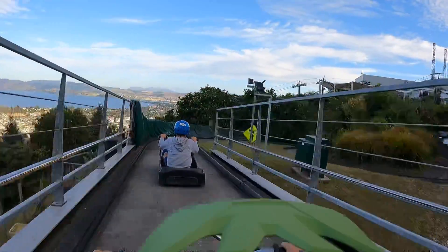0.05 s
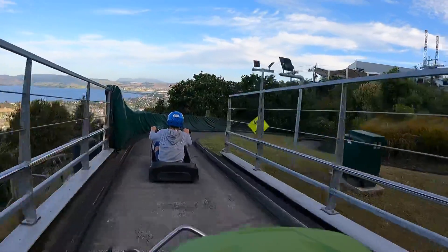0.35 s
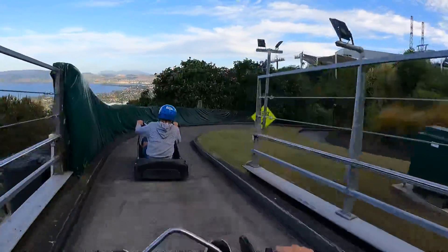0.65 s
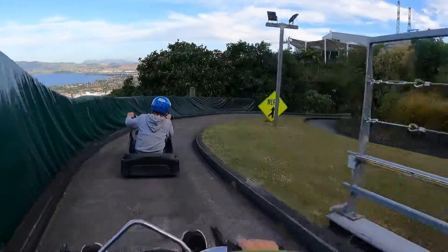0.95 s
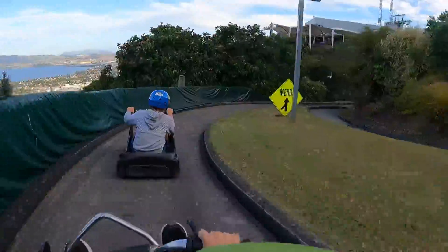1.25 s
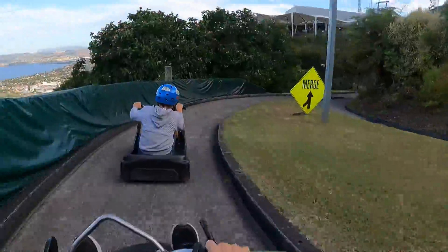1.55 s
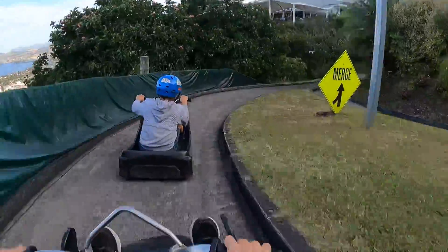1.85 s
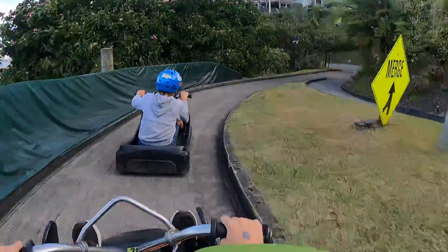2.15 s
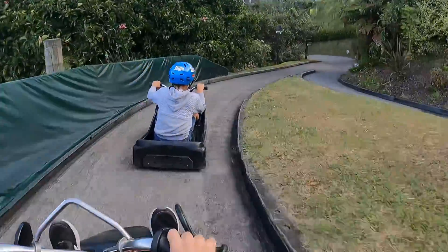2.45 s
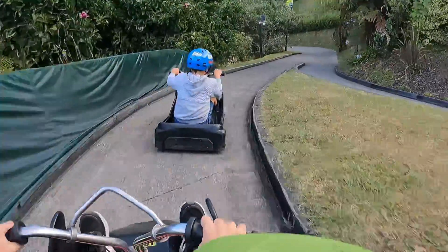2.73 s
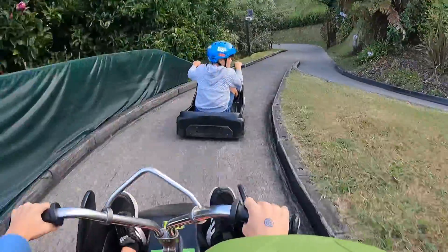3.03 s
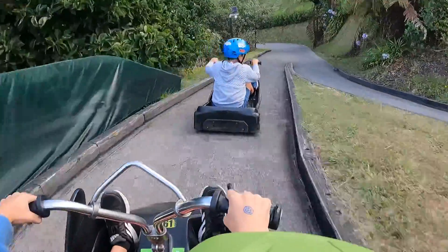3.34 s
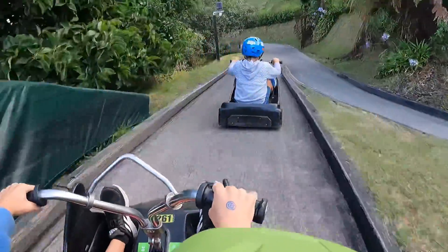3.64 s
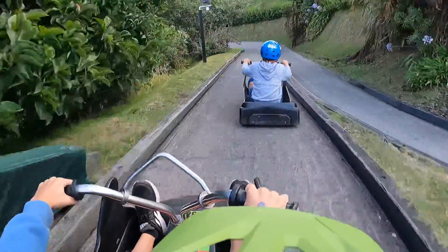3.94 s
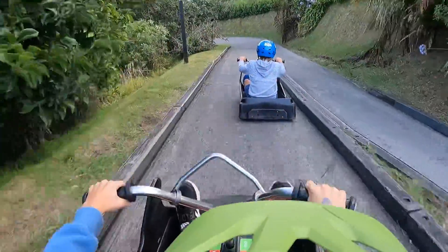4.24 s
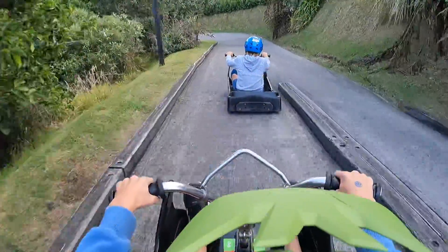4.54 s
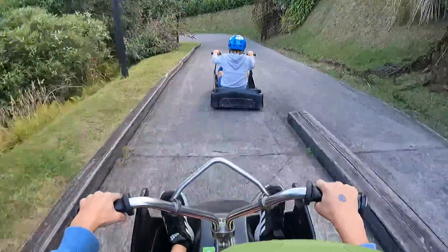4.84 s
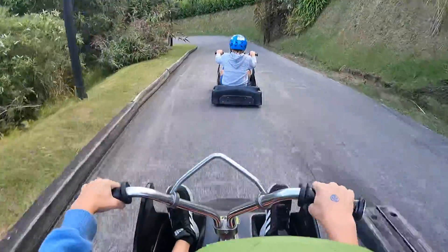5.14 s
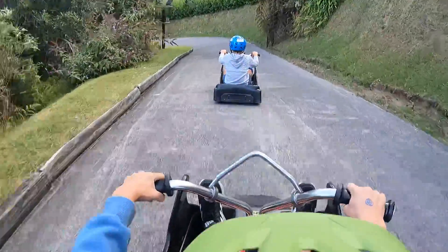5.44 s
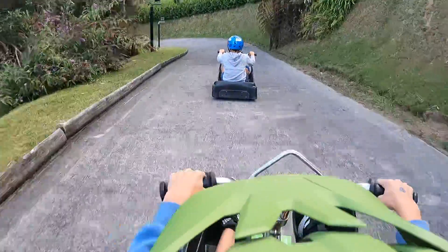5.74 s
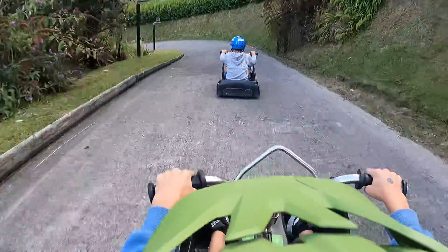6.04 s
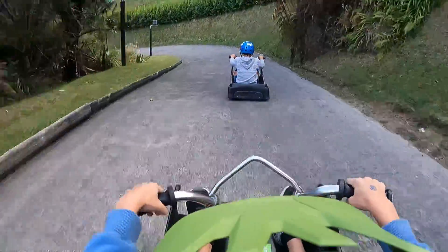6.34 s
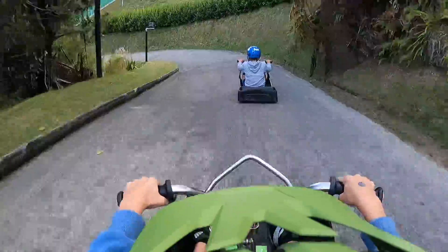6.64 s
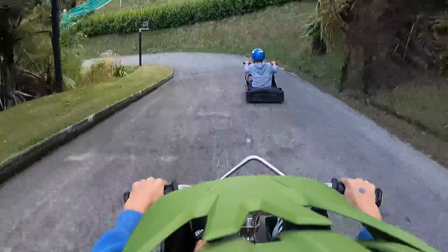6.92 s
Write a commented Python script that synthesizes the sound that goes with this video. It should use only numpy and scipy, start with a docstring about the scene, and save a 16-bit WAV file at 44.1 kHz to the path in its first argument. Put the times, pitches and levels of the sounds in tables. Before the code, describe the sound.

Hard wheels rumble on rough concrete as a coasting luge cart knocks and rattles, with low wind buffeting.

```python
"""A hollow plastic boom with clattering knocks: a luge cart coasting down concrete, heard from the seat.
Hard wheels on the rough surface drive the tub's modes; joints and ridges knock the chassis and
leave parts ringing. Loose fittings chatter, grit crunches, a flat-spotted wheel scuffs once a turn.
Thin whistles and a faint tinkle flicker in the treble. Wind buffets the microphone."""
import sys
import numpy as np
from scipy import signal
from scipy.fft import rfft, irfft, next_fast_len
from scipy.io import wavfile
from scipy.ndimage import uniform_filter1d, map_coordinates

SR = 44100
rng = np.random.default_rng(int(sys.argv[2]) if len(sys.argv) > 2 else 0)


def generate_wav(sig):
    """Save sig (samples, or channels by samples) to the path in sys.argv[1] as 16-bit PCM at SR."""
    pcm = np.round(np.clip(np.atleast_2d(sig).T, -1, 1) * 32767).astype(np.int16)
    wavfile.write(sys.argv[1], SR, pcm)


N = 307818

# plastic tub modes: f/Hz, width/Hz, gain/dB
TUB_MODES = [(159.8, 30, -3), (186.4, 52, -7.5), (247.6, 20.8, 0), (299.4, 47.6, -4.5), (375, 85, -8),
             (409.2, 28, -1.5), (427.3, 27, -9.5), (542.6, 29, -11), (582, 24, -10.5)]
# chassis and fitting modes: f/Hz, width/Hz, gain/dB
CHASSIS_MODES = [(751, 115, 18.5), (884, 82, 5), (1012, 140, 2.5), (1420, 67, -4), (2070, 33, -16),
                 (2440, 160, -30), (2570, 420, -27.5), (3260, 390, -35), (4670, 1900, -24.5)]
# steering click spectrum: f/Hz, gain/dB
CLICK_SPECTRUM = [(600, -57), (3000, -4), (4300, 7), (5000, -3), (6800, -7.5), (8500, -11), (10000, -27.5),
                  (12500, -20), (14500, -44.5)]


def tub(shake):
    """Rough concrete drives the tub's modes; rumble fills in between, the wheels add their drone."""
    # wheel drive on the tub: t/s, level/dB
    boom_levels = [(0, -15.5), (.3, -16), (.55, -15), (1.45, -14.5), (1.7, -17), (2.0, -15), (2.4, -16),
                   (2.7, -15), (2.95, -13.5), (3.15, -15.5), (4.5, -16), (4.9, -15.5), (5.1, -13.5),
                   (5.35, -13), (5.6, -17), (6.3, -14), (6.75, -15.5), (6.98, -19.5)]
    # upper modes: t/s, level/dB
    upper_levels = [(0, -24.5), (.9, -27), (1.35, -26.5), (1.6, -28), (2.1, -28), (2.6, -24.5), (3.0, -27),
                    (3.65, -23.5), (4.6, -25.5), (5.3, -24.5), (6.98, -27.5)]
    # upper modes groan as the tub leans into the bend: t/s, width/s, rise/dB
    groans = [(1.325, 0.026, 7), (1.44, 0.036, 3)]
    # rumble spectrum: f/Hz, gain/dB
    rumble_spectrum = [(60, -54.5), (115, -23), (150, -13), (200, 4), (300, -7.5), (480, -8.5), (630, -27),
                       (690, -23.5), (1000, -22.5), (1500, -35.5), (3000, -74.5)]
    boom_db = curves(boom_levels)[0] + wobble(18)  # wheel load shifts at random
    upper_db = curves(upper_levels)[0] + swells(groans) + 1.2 * wobble(18)
    roughness = impacts(per_s=2500, spread_db=4.5)
    modes = unit(band(ringing(roughness, TUB_MODES), 132.8, 646, order=9))
    body = modes + amp(-8) * unit(coloured(rng.standard_normal(N), rumble_spectrum))
    low = filtered(body, lambda hz: 1 / (1 + (hz / 350) ** 12))
    boom = steadied(unit(low) + amp(-3) * wheels(), span_s=0.062, share=0.92)
    upper = steadied(body - low, span_s=0.098, share=0.82) * amp(shake)
    return band(amp(boom_db) * boom + amp(upper_db) * upper, 30, 2500, order=2)  # soft plastic: no treble


def wheels():
    """Wheels bounce on the concrete: a firm hum inside an uneven drone that sinks along the track."""
    # bounce resonance: t/s, f/Hz
    bounce_pitch = [(0, 205), (.55, 206.6), (1.0, 220.3), (1.4, 226.6), (1.9, 204.3), (2.3, 190.3),
                    (2.9, 173.6), (3.6, 184.4), (4.1, 182), (4.6, 170.6), (5.3, 177.1), (6.2, 169),
                    (6.98, 170.7)]
    # hum over drone: t/s, level/dB
    hum_levels = [(0, -8), (2.2, -6), (2.85, -0.5), (3.6, -7.5), (4.6, -5.5), (5.25, 2), (5.6, -2.5),
                  (6.98, -3)]
    bounce_hz, = curves(bounce_pitch)
    hum_db, = curves(hum_levels)
    phase = 2 * np.pi * np.cumsum(bounce_hz) / SR
    drone = unit(wobble(38) * np.cos(phase) + wobble(38) * np.sin(phase))
    hum = unit(np.cos(phase + 1.1 * wobble(14)))
    return unit(drone + amp(hum_db) * hum)


def jolts():
    """Joints and ridges in the concrete hit the wheels."""
    # blows, levels before jolt()'s offsets: t/s, rattle/dB, knock/dB, clink/dB, knock f/Hz, rattle f/Hz
    blows = [(0.0507, -38, -19.5, -60, 850, 2040), (0.060, -38, -21, -57, 885, 1990),
             (0.1047, -25, -16, -54, 726, 2000), (0.1381, -35, -21, -58, 724, 2630),
             (0.1524, -30, -18, -57, 726, 2010), (0.178, -30, -25, -57, 780, 1900),
             (0.2149, -33, -24.5, -53, 1020, 1950), (0.2754, -38, -18, -55, 830, 2080),
             (0.289, -40, -20.5, -56, 900, 1900), (0.323, -41, -21, -62, 750, 1900),
             (0.3554, -43, -23, -65, 705, 1780), (0.393, -36, -19.5, -60, 805, 1950),
             (0.4614, -38, -18, -51, 784, 2000), (0.505, -38, -21.5, -53, 960, 2000),
             (0.5634, -28.5, -21, -46.5, 735, 2160), (0.6714, -30, -16.5, -42, 717, 2500),
             (0.6923, -28.5, -18, -44.5, 740, 2660), (0.7554, -29, -28, -45, 930, 2630),
             (0.7969, -24.5, -14, -40, 740, 1970), (0.8204, -31, -25, -45.5, 726, 2760),
             (0.8692, -25.5, -20, -42, 680, 2240), (0.9305, -39, -22, -41.5, 694, 2300),
             (0.9401, -24.5, -15, -41.5, 695, 1950), (0.969, -32, -19, -53, 740, 2100),
             (0.9865, -35, -18.5, -40, 704, 2400), (0.9966, -25, -16, -40, 760, 2070),
             (1.0284, -30, -23, -44, 766, 2280), (1.1122, -24, -28, -42, 1090, 2050),
             (1.136, -38, -21, -58, 800, 1900), (1.1852, -21.5, -15.5, -41, 700, 1930),
             (1.2014, -27, -18, -58, 856, 2070), (1.2152, -27, -19, -59, 776, 2060),
             (1.2371, -25.5, -19, -51, 720, 1920), (1.271, -35, -20, -57, 745, 2000),
             (1.3215, -34, -17, -43.5, 690, 2010), (1.3354, -33, -17, -44, 710, 2100),
             (1.3823, -42, -25, -53, 741, 2260), (1.404, -42, -21, -54, 740, 1900),
             (1.4260, -33, -25, -50, 690, 1808), (1.453, -32, -19, -52, 720, 1920),
             (1.5451, -36, -18.5, -51, 770, 1960), (1.6532, -49, -20.5, -60, 844, 2230),
             (1.7549, -39, -19, -64, 890, 1800), (1.8262, -35, -24.5, -66, 810, 2140),
             (1.992, -36, -27, -59, 800, 1900), (2.119, -34, -26, -54, 979, 1960),
             (2.2327, -36, -36, -58, 730, 1740), (2.313, -34, -29, -66, 850, 1947),
             (2.425, -44, -24, -65, 776, 1800), (2.547, -40, -25, -63, 810, 1750),
             (2.601, -41, -22, -56, 753, 1975), (2.7385, -36, -23, -56, 740, 2430),
             (2.839, -37.5, -24.5, -56, 902, 1996), (2.883, -43, -40, -51.5, 737, 2130),
             (2.996, -41.5, -25, -62, 799, 1890), (3.2457, -29, -29, -64, 1239, 2080),
             (3.442, -40, -23, -51, 740, 2168), (3.5753, -39, -20, -67, 755, 2112),
             (3.62, -35, -23, -57, 803, 2006), (3.662, -32, -19.5, -59, 775, 2030),
             (3.6934, -30, -23.5, -58, 818, 2030), (3.922, -45, -25, -67, 676, 2289),
             (3.9959, -44, -24, -64, 679, 1741), (4.0984, -41, -33, -49, 870, 2190),
             (4.2054, -31.5, -24, -51, 763, 1980), (4.295, -38, -29, -54, 814, 2100),
             (4.4762, -32, -26, -45, 788, 2110), (4.533, -35, -23, -44, 734, 2023),
             (4.64, -27, -30, -54, 890, 1910), (4.6566, -33.5, -36, -46, 1124, 2780),
             (4.7321, -26, -21, -46, 765, 2010), (4.776, -27, -26, -45, 790, 2092),
             (4.79, -26.5, -24, -44, 919, 2030), (4.831, -21, -15.5, -45, 745, 2260),
             (4.8942, -28, -18.5, -42, 750, 2320), (4.9218, -25, -25, -44, 860, 1940),
             (5.012, -32, -22, -48, 745, 2058), (5.036, -27, -20, -53, 756, 1900),
             (5.0568, -30, -32.5, -46, 901, 2100), (5.1872, -25, -22, -51, 770, 1960),
             (5.222, -45, -23.5, -58, 760, 1900), (5.2856, -32, -27, -52.5, 782, 2205),
             (5.3466, -38.5, -29, -59, 810, 1770), (5.446, -30.5, -22, -50.5, 1030, 2150),
             (5.508, -36, -26, -58, 850, 1904), (5.6104, -53, -25.5, -63, 773, 1704),
             (5.7786, -37, -28, -59, 902, 1950), (5.8077, -41, -20.5, -64, 794, 1960),
             (5.926, -40, -29, -47.5, 747, 2060), (6.0442, -36, -39, -50, 740, 1750),
             (6.1559, -37, -28, -49, 838, 2163), (6.2145, -34.5, -28, -50, 895, 2110),
             (6.295, -33, -26.5, -51, 800, 2100), (6.3534, -36, -29, -47, 821, 2570),
             (6.516, -38, -22, -61, 780, 2000), (6.578, -38, -25, -52, 1031, 1973),
             (6.632, -32, -27, -54.5, 816, 2000), (6.7694, -40, -27, -51, 680, 2047)]
    # the cart drags over the first bend's ridges, taps later joints: t/s, contact length/ratio
    drag_ratios = [(0, 0.77), (.55, 1.7), (.67, 3.4), (1.03, 1.3), (1.11, 0.4), (1.25, 1.7), (1.35, 4.7),
                   (1.55, 1.3), (4.6, 1.3), (5.3, 1.04), (6.98, 1.106)]
    out = np.zeros(N + SR)
    for start_s, *strike in blows:
        drag = np.interp(start_s, *np.transpose(drag_ratios))
        blow = jolt(drag, *strike)
        out[round(start_s * SR):][:len(blow)] += blow
    return out[:N]


def jolt(drag, rattle_db, knock_db, clink_db, knock_hz, rattle_hz):
    """One blow cracks, knocks and rattles the chassis and clinks the steering."""
    # steering bar and brake linkage modes: f/Hz, width/Hz, gain/dB
    steel_modes = [(3640, 110, 8.5), (4340, 100, 2), (5300, 130, -2.5), (5900, 160, -7), (6860, 84, -5.5),
                   (7730, 150, -6.5), (8600, 81, -6.5)]
    # each blow lands elsewhere: new mode pitches and gains
    struck = [(hz * (1 + 0.054 * rng.standard_normal()), 0.45 * width_hz, db + 2 * rng.standard_normal())
              for hz, width_hz, db in CHASSIS_MODES]
    steel = [(hz * (1 + 0.05 * rng.standard_normal()), width_hz, db + 4 * rng.standard_normal())
             for hz, width_hz, db in steel_modes]
    knock = unit(band(ringing(burst(t60_s=0.048 * drag), struck), 470, 1900, order=3))
    knock += amp(-1) * unit(ringing(burst(t60_s=0.018), TUB_MODES[-2:]))
    knock += amp(-2) * unit(ringing(burst(t60_s=0.019), [(knock_hz, 40, 0)]))
    rattle = unit(band(ringing(burst(t60_s=0.053 * drag), struck), 1400, 4600, order=4))
    rattle += amp(-6.5) * unit(ringing(burst(t60_s=0.038), [(rattle_hz, 90, 0)]))
    contact = burst(t60_s=0.045 * drag)
    clink = unit(coloured(contact, CLICK_SPECTRUM))
    clink += amp(-4) * unit(band(ringing(contact, steel), 3300, 9000, order=4))
    chassis = at_level(knock, knock_db - 8) + at_level(rattle, rattle_db - 11)
    crack = at_level(band(burst(t60_s=0.0072), 1100, 4100, order=3), rattle_db - 21)
    return band(chassis, 280, 3400, order=4) + crack + at_level(clink, clink_db - 3)


def rings():
    """Hard blows leave a panel or fitting ringing briefly, with a dry buzz."""
    # ringing parts: t/s, f/Hz, level/dB, t60/s
    parts = [(0.107, 563, -13.5, 0.08), (0.138, 2640, -34, 0.036), (0.153, 533, -15, 0.085),
             (0.669, 713, -15.5, 0.11), (0.688, 2560, -35, 0.078), (0.748, 2720, -34.5, 0.11),
             (0.797, 1960, -27, 0.037), (0.87, 728, -20, 0.095), (1.187, 1934, -27, .05),
             (1.189, 544, -15.5, 0.11), (1.232, 553, -14, 0.16), (1.443, 402, -7, 0.13),
             (1.449, 525, -15, 0.087), (1.547, 804, -25, 0.053), (1.826, 1040, -27, 0.053),
             (3.245, 1001, -20, 0.058), (3.246, 1982, -31, 0.052), (3.247, 3090, -38, .06),
             (3.246, 4150, -42.5, 0.055), (3.428, 4320, -41, 0.041), (3.577, 1087, -24.5, 0.066),
             (3.662, 3850, -42.5, .05), (3.692, 4400, -43, 0.096), (4.657, 4500, -35, 0.044),
             (4.79, 4410, -42, .06), (4.832, 2420, -32, 0.085), (4.832, 784, -17.5, 0.076),
             (4.831, 1400, -33, 0.048), (4.895, 2330, -32, 0.074), (4.921, 558.6, -10.5, 0.076),
             (4.921, 6500, -38.5, 0.03), (4.922, 3330, -31.5, 0.041), (5.057, 4430, -41, .06),
             (5.188, 3300, -34, 0.029), (5.188, 1760, -31, 0.038), (5.19, 787, -24, 0.13),
             (5.779, 1104, -25, 0.051)]
    rise_s, relative_width = 0.0018, 0.035
    out, t = np.zeros(N + SR), np.arange(SR // 5) / SR
    for start_s, hz, db, t60_s in parts:
        buzz_rad = np.cumsum(rng.standard_normal(len(t))) * np.sqrt(2 * np.pi * relative_width * hz / SR)
        envelope = amp(db - 60 * t / t60_s) * (1 - np.exp(-t / rise_s))
        ring = envelope * np.sin(2 * np.pi * hz * t + buzz_rad)
        out[round(start_s * SR):][:len(t)] += band(ring, hz / 2, hz * 2, order=2)
    return out[:N]


def chatter(surface_db, shake):
    """Loose fittings never rest, and tap harder as the cart shakes."""
    taps = unit(impacts(per_s=130, spread_db=2)) + amp(3.5) * rng.standard_normal(N)
    taps *= amp(2.5 * np.clip(shake, -1, 2))
    rattle = band(ringing(taps, CHASSIS_MODES), 712, 2560, order=4)
    return amp(surface_db + 0.27) * steadied(rattle, span_s=0.99, share=0.51)


def wind():
    """Air tumbles over the microphone in low lumps."""
    # airflow: t/s, level/dB
    flow_levels = [(0, -20.5), (.5, -31), (.9, -29.5), (1.35, -26.5), (2.0, -31), (2.85, -34), (3.2, -30.5),
                   (3.9, -34), (4.4, -29), (5.3, -30.5), (6.0, -33.5), (6.5, -27.5), (6.98, -31)]
    # gusts: t/s, width/s, rise/dB
    gusts = [(.7, 0.05, 2.5), (1.68, 0.03, 10.5), (3.06, 0.09, 5.5), (5.79, 0.056, 8), (6.16, 0.039, 6),
             (6.5, 0.039, 1)]
    # buffet spectrum: f/Hz, gain/dB
    buffet_spectrum = [(10, -2.5), (22, 2.5), (38, 8), (55, 8.5), (85, 7), (115, 4), (170, -3),
                       (400, -57.5), (1500, -120)]
    turbulence_db = 3 * wobble(12)
    buffet_db = curves(flow_levels)[0] + swells(gusts) + turbulence_db + 2.5
    buffet = coloured(rng.standard_normal(N), buffet_spectrum)
    return amp(buffet_db) * steadied(buffet, span_s=0.34, share=0.36)


def grit(surface_db, shake):
    """Sand grains crunch under the wheels over a fine rolling hiss."""
    # crunch spectrum: f/Hz, gain/dB
    crunch_spectrum = [(300, -56), (900, -7.5), (1550, 6), (2200, -3), (2900, 1), (3600, 0.5), (4450, -2.5),
                       (4800, -4), (6500, -10.5), (7900, -13), (9300, -21), (12000, -29), (15000, -50.5)]
    grains = unit(impacts(per_s=260, spread_db=3.5)) + amp(9.5) * rng.standard_normal(N)
    load = np.clip(unit(0.73 * shake + wobble(45)), -1, 2)
    crunch = coloured(grains * amp(1.9 * load), crunch_spectrum)
    return amp(surface_db + 2.5) * steadied(crunch, span_s=0.67, share=0.58)


def flat_spot(turns, chatter_db, grit_db):
    """Once a turn a wheel's flat nudges chassis and steering, harder on rough track up to a cap."""
    rise_s, t60_s, spread_db = 0.003, 0.04, 2.5
    onsets = np.flatnonzero(np.diff(np.floor(turns)))
    drops = np.zeros(N)
    drops[onsets] = amp(spread_db * np.clip(rng.standard_normal(N)[onsets], -2, 2))
    t = np.arange(SR // 10) / SR
    press = (1 - np.exp(-t / rise_s)) * amp(-60 * t / t60_s)
    contact = signal.fftconvolve(drops, press)[:N] * rng.standard_normal(N)
    rattle = unit(band(ringing(contact, CHASSIS_MODES), 850, 3100, order=4))
    clink = unit(coloured(contact, CLICK_SPECTRUM))
    rattle_db = np.minimum(chatter_db, -41) - 12.5
    clink_db = np.minimum(grit_db, -57) - 13
    return amp(rattle_db) * rattle + amp(clink_db) * clink


def whistles():
    """Thin, faint, flickering high whistles of narrow-band noise."""
    # whistles: t/s, length/s, f/Hz, level/dB
    events = [(0.06, 0.067, 8550, -65), (0.073, 0.17, 10000, -76), (1.112, 0.093, 8670, -66),
              (1.23, 0.13, 8500, -66), (4.033, 0.27, 7400, -68), (4.633, 0.093, 5400, -65),
              (4.637, .06, 9100, -65), (5.101, 1.7, 7650, -77), (6.011, .07, 9000, -76),
              (6.415, 0.28, 8486, -76), (6.82, 0.051, 8570, -71)]
    width_hz = 210
    out, t = np.zeros(N), np.arange(N) / SR
    for start_s, length_s, hz, db in events:
        swell = np.sin(np.pi * np.clip((t - start_s) / length_s, 0, 1))
        whistle = band(rng.standard_normal(N), hz - width_hz / 2, hz + width_hz / 2, order=2)
        out += amp(db) * swell * unit(whistle)
    flicker = unit(amp(2.5 * np.clip(wobble(12), -2, 1)))
    return out * flicker


def tinkle():
    """Faint, flickering high tinkle: narrow bands, each rung by its own random ticks."""
    # tinkle bands: f/Hz, width/Hz, gain/dB
    bands = [(4450, 90, 3.5), (7740, 70, 0), (8050, 90, -3.5), (8550, 70, -5), (9100, 80, -9.5),
             (12500, 300, -16)]
    # all bands together: t/s, level/dB
    tinkle_levels = [(0, -77.5), (1.3, -64), (1.9, -83), (2.8, -78), (3.9, -77.5), (4.7, -73), (5.25, -73),
                     (5.6, -76), (6.2, -70), (6.98, -72)]
    out = np.zeros(N)
    for hz, width_hz, db in bands:
        ticks = impacts(per_s=44, spread_db=5)
        out += amp(db) * unit(band(ticks, hz - width_hz / 2, hz + width_hz / 2, order=1))
    return amp(curves(tinkle_levels)[0]) * unit(out)


def burst(t60_s):
    """A contact and its quick rebound: a dying scatter of tiny collisions."""
    rise_s = 0.0008
    t = np.arange(SR // 12) / SR
    since_rebound_s = t - rng.uniform(0.002, 0.005)
    rebound = (since_rebound_s > 0) * amp(-11 - 60 * np.abs(since_rebound_s) / t60_s)
    decay = amp(-60 * t / t60_s) + rebound
    return rng.choice([-1, 1], len(t)) * decay * (1 - np.exp(-t / rise_s))


def impacts(per_s, spread_db):
    """Random tiny blows of log-normal size."""
    hits = (rng.random(N) < per_s / SR) * rng.choice([-1, 1], N)
    return hits * amp(spread_db * np.clip(rng.standard_normal(N), -2, 2))


def ringing(x, modes):
    """x through resonances: f/Hz, width/Hz, gain/dB."""
    return filtered(x, lambda f: sum(amp(db) * 1j * f * width / (hz * hz - f * f + 1j * f * width)
                                     for hz, width, db in modes))


def coloured(x, spectrum):
    """x through a spectrum: f/Hz, gain/dB."""
    hz, db = np.transpose(spectrum)
    return filtered(x, lambda f: amp(np.interp(np.log(f + 1), np.log(hz), db)))


def filtered(x, response):
    """x through a complex frequency response."""
    size = next_fast_len(len(x) + 4096)
    return irfft(rfft(x, size) * response(np.fft.rfftfreq(size, 1 / SR)), size)[:len(x)]


def band(x, low_hz, high_hz, order):
    """Causal band-pass."""
    sos = signal.butter(order, [low_hz, min(high_hz, SR / 2 - 1)], "band", fs=SR, output="sos")
    return signal.sosfilt(sos, x)


def steadied(x, span_s, share):
    """Unit-rms x, swells longer than span_s partly evened out, as by a damped load."""
    size = max(int(span_s * SR), 1)
    power = np.abs(uniform_filter1d(uniform_filter1d(x ** 2, size), size))
    return unit(x / (power + 1e-4 * power.mean()) ** (share / 2))


def curves(rows):
    """One value per sample for each column after t/s."""
    times_s, *columns = np.transpose(rows)
    return [np.interp(np.arange(N) / SR, times_s, column) for column in columns]


def swells(rows):
    """Sum of bell curves in dB: t/s, width/s, height/dB."""
    t = np.arange(N) / SR
    return sum(db * np.exp(-((t - centre_s) / width_s) ** 2) for centre_s, width_s, db in rows)


def wobble(knots_per_s):
    """Smooth random curve, rms near 1."""
    knots = rng.standard_normal(int(N * knots_per_s / SR) + 4)
    return map_coordinates(knots, [np.arange(N) * knots_per_s / SR])


def at_level(x, db):
    """x with its loudest 6 ms at this rms level."""
    return amp(db) * x / np.sqrt(uniform_filter1d(x ** 2, size=256).max())


def amp(db):
    return 10 ** (np.asarray(db) / 20)


def unit(x):
    return x / np.sqrt(np.mean(x ** 2) + 1e-20)


def scene():
    """Tub, fittings and grit share one shaking; the wind is independent."""
    # track roughness, high on two coarse stretches: t/s, chatter/dB, grit/dB
    surface = [(0.0, -37.5, -56.5), (0.62, -39, -58), (0.83, -40, -53), (1.36, -37, -53.5),
               (1.48, -39, -57), (2.16, -43, -63), (2.7, -40.5, -59.5), (3.21, -42.5, -61),
               (3.6, -39.5, -59), (4.0, -41.5, -60.5), (4.57, -39.5, -55.5), (4.88, -36.5, -53),
               (5.21, -37, -56.5), (5.75, -45, -61), (6.08, -41.5, -54.5), (6.98, -43.5, -59.5)]
    # patches between ridges, mostly smooth, where fittings and grit settle: t/s, width/s, change/dB
    patches = [(.03, 0.017, 2), (.087, .012, -6), (.625, 0.029, -1), (.915, .012, -3), (1.09, 0.018, -9.5),
               (1.37, .01, -7), (1.52, .02, -3), (1.6, .03, -2), (5.15, .035, -3)]
    chatter_db, grit_db = np.array(curves(surface)) + swells(patches)
    wheel_turns_per_s = 15.8 * (1 + 0.08 * wobble(5))
    turns = np.cumsum(wheel_turns_per_s) / SR
    # out-of-round wheels shake the cart once a turn, the surface at random
    shake = unit(0.13 * np.sin(2 * np.pi * turns) + wobble(45))
    mix = tub(shake) + chatter(chatter_db, shake) + grit(grit_db, shake)
    mix += wind() + whistles() + tinkle()
    mix += flat_spot(turns, chatter_db, grit_db) + jolts() + rings()
    return mix[None]


def record(dry):
    """Brief fades at both ends, then a steep low-pass."""
    cutoff_hz = 15200
    fade = signal.windows.tukey(N, 0.001)
    return signal.sosfilt(signal.cheby1(12, 0.1, cutoff_hz, fs=SR, output="sos"), dry * fade)


dry = scene()
out = record(dry)
generate_wav(out)
```